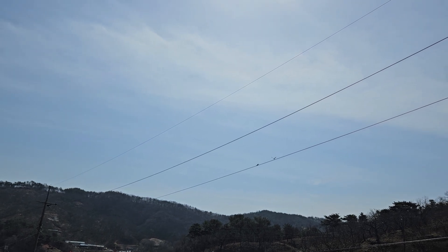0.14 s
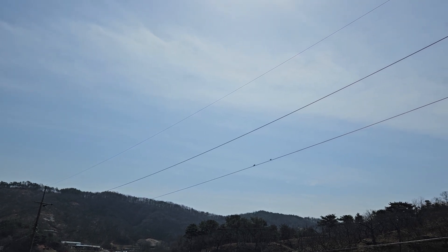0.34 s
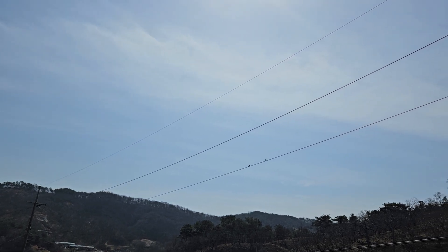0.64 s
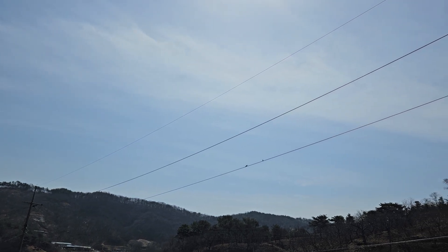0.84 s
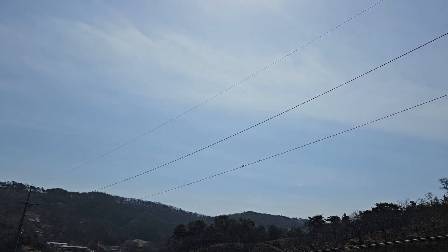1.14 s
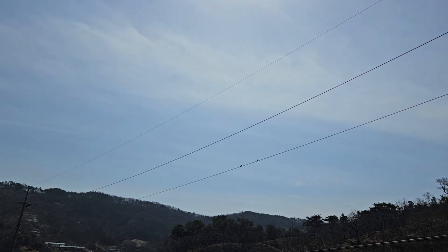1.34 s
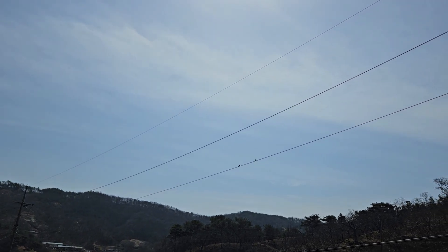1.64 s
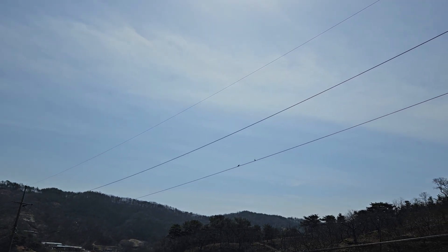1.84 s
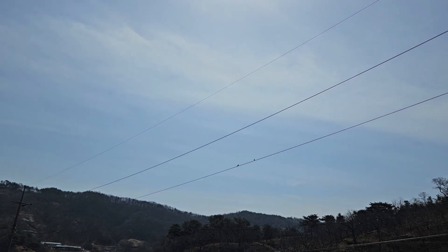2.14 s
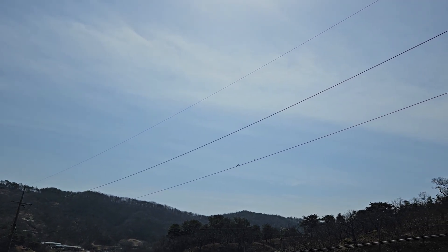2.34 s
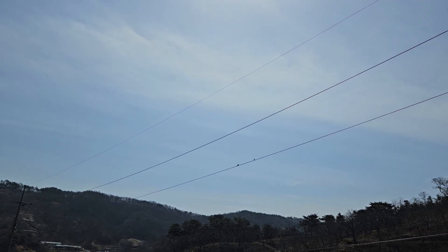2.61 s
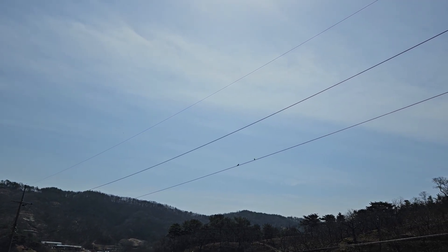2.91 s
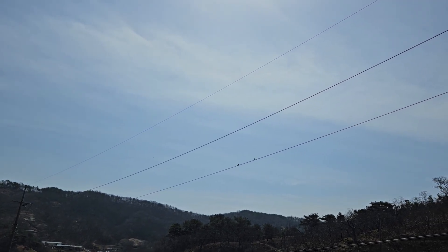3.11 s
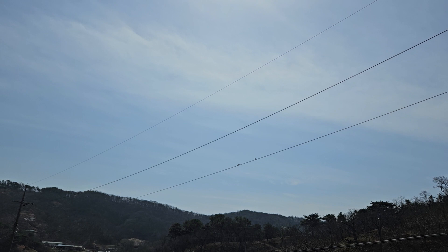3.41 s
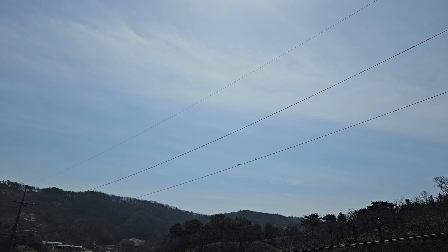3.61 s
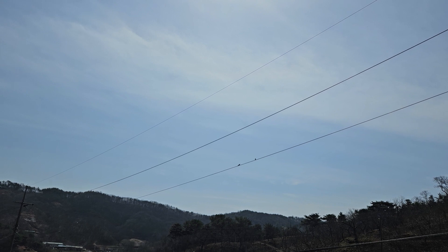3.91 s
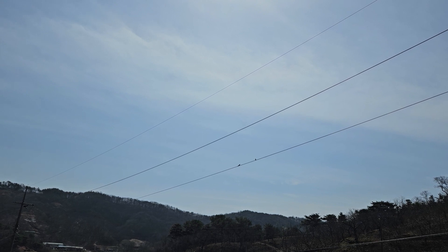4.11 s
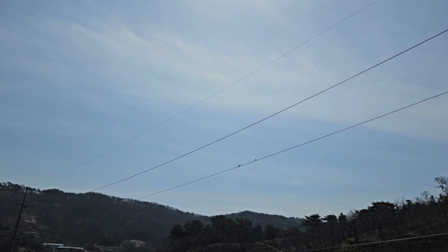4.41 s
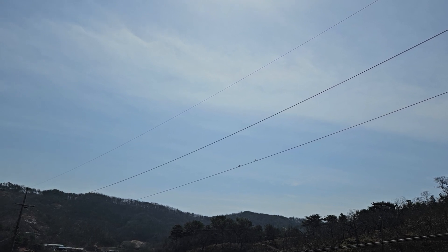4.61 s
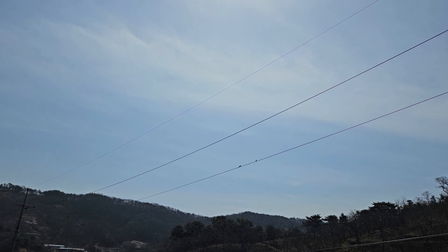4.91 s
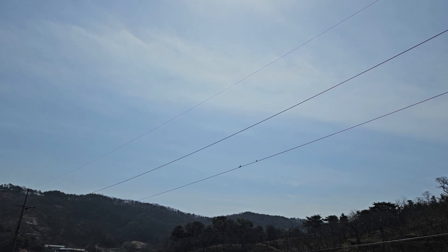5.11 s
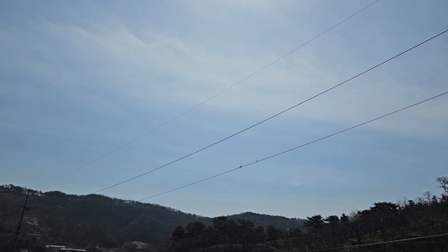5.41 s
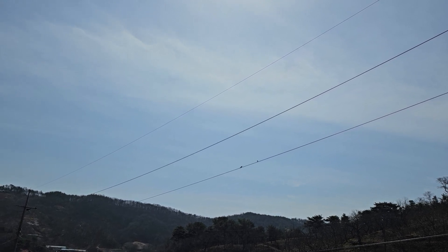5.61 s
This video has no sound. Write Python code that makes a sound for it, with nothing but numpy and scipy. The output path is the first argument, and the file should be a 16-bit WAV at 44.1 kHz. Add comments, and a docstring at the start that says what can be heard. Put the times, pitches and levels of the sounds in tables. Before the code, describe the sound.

Swallows on overhead wires twitter in quick high chirps and buzzy notes, with two dry rattles, over low wind buffeting and faint distant wash.

```python
"""Swallows twitter on overhead wires above a valley: gliding sine whistles, rasps of filtered pulses
and two dry rattles of ringing clicks. Sparse reflections give short echoes from nearby walls.
Shaped noise makes wind buffeting a small stereo microphone over a distant wash of road and leaves.
A few dry ticks, a faint wavering hum and thin far calls, all sines, fill in the rest."""
import sys
import numpy as np
from scipy import signal
from scipy.fft import rfft, irfft
from scipy.io import wavfile
from scipy.ndimage import uniform_filter1d

SR = 44100
rng = np.random.default_rng(int(sys.argv[2]) if len(sys.argv) > 2 else 0)


def transcribe(u):
    """Save the signal u as a 16-bit wav file named by the first command-line argument.

    u: samples, shape (n,) or (channels, n), limited to [-1, 1]; the rate is SR.
    q: integer samples, one column per channel.
    """
    v = np.clip(np.atleast_2d(u).T, -1, 1)
    q = np.round(v * 32767).astype(np.int16)
    wavfile.write(sys.argv[1], SR, q)


N = 253570

# Whistled notes and overtones: [start_s, length_s, first_pitch_hz, last_pitch_hz,
# level_db at the peak, peak_place 0-1 along the note]
NOTES = [(.003, .012, 5680, 4820, -51, 0.64), (0.012, .022, 4990, 4760, -47.5, 0.2),
         (.004, 0.0098, 3350, 3100, -50.5, 0), (.006, 0.024, 2830, 2395, -53.5, 0),
         (0.116, .022, 3700, 4600, -54.5, 0.94), (.136, 0.023, 4650, 4490, -55, 0.57),
         (0.132, 0.018, 6560, 6600, -66.5, 0), (0.18, 0.055, 5000, 6840, -66, 0),
         (.186, .019, 4750, 3920, -56.5, 0.93), (0.184, 0.013, 2880, 3410, -55, 0.96),
         (0.199, 0.024, 3255, 3530, -51.5, 0.9), (0.317, 0.0069, 6420, 5390, -56.5, .5),
         (0.371, 0.045, 3270, 3880, -57.5, 0.83), (0.408, 0.0096, 3910, 2790, -54, 1),
         (0.418, .015, 5000, 5250, -51, 0.26), (.428, 0.018, 5230, 6180, -53.5, 0.25),
         (.5, 0.091, 4540, 4080, -73, 0.55), (.599, 0.07, 2980, 4040, -71, 0.4),
         (.6, .045, 2520, 3040, -74, 0.5), (0.644, 0.034, 3000, 3370, -66.5, 0.6),
         (0.655, 0.02, 3960, 4250, -66, .5), (.694, 0.013, 5780, 6460, -59, 0),
         (.695, 0.043, 3830, 4020, -57, 0.68), (.703, 0.057, 2660, 2770, -65, 1),
         (.704, 0.018, 4880, 4970, -56, .2), (0.778, 0.03, 2225, 2750, -64, 0.8),
         (0.798, 0.024, 3480, 3430, -55, 0), (0.81, 0.011, 2490, 2850, -65, 0.3),
         (.833, 0.023, 3720, 4010, -57.5, 1), (.835, .022, 3100, 3520, -54, .5),
         (.836, 0.0086, 5030, 5500, -58.5, 0.85), (0.844, .01, 5500, 4860, -53.5, .3),
         (0.957, .014, 4430, 4450, -64.5, .3), (0.984, 0.034, 4100, 4480, -69, 0.66),
         (.965, .03, 5500, 5900, -73, .6), (1.003, 0.03, 5750, 6400, -70, 0.8),
         (0.952, 0.035, 3050, 3050, -85, 0.2), (1.033, .02, 8520, 8500, -68, .3),
         (1.038, .019, 4450, 4420, -62, 0), (1.04, 0.022, 3000, 2960, -65.5, 0.14),
         (1.165, 0.035, 3900, 3896, -69, 0.4), (1.243, 0.033, 3700, 3360, -71.5, 0.55),
         (1.332, 0.011, 4880, 4640, -51.5, 0.04), (1.383, 0.014, 3620, 3060, -64.5, 0.23),
         (1.425, .02, 4750, 4830, -64, 0.15), (1.431, 0.015, 4280, 4260, -63, 0),
         (1.46, 0.031, 6950, 6670, -71, .4), (1.39, 0.044, 7300, 7400, -73, 0.2),
         (1.428, .015, 5900, 5900, -70, .3), (1.479, 0.01, 3180, 3190, -65.5, 0.4),
         (1.578, .015, 3520, 2970, -75, .5), (1.602, .018, 3120, 3300, -73, .6),
         (1.668, 0.046, 2000, 2810, -74, .6), (2.045, .015, 5760, 5760, -70, .3),
         (1.737, .044, 4140, 4480, -68.5, 0.4), (1.797, 0.033, 2406, 2330, -72.5, 0.2),
         (2.073, 0.014, 3660, 3120, -68, 0.5), (2.112, .022, 3205, 3910, -57.5, .5),
         (2.135, 0.019, 3830, 3920, -62, 0.5), (2.232, 0.0215, 4200, 4810, -62.5, 0.7),
         (2.254, .014, 4730, 5200, -66, 0.5), (2.267, 0.02, 5300, 4050, -60.5, 0.26),
         (2.284, 0.012, 3605, 3260, -53.5, 0.86), (2.296, .015, 6400, 4800, -59, 0.4),
         (2.294, 0.022, 7300, 7390, -65, .1), (2.295, 0.018, 3270, 2490, -58.5, 0.62),
         (2.296, 0.039, 4260, 4240, -61.5, .1), (2.428, 0.032, 3860, 3100, -71, 0.56),
         (2.608, .012, 5100, 4880, -68, 0.7), (2.623, .018, 4850, 2930, -63.5, .4),
         (2.64, 0.019, 2920, 2750, -68, 0.5), (2.669, .02, 3190, 3810, -52, 0.63),
         (2.689, 0.04, 3810, 3740, -54, 0.07), (2.69, 0.022, 3080, 3120, -66, 0.4),
         (2.683, 0.02, 6240, 6140, -65, 0.7), (2.792, .042, 2580, 2770, -66, 1),
         (2.825, 0.019, 5300, 6340, -62.5, 0), (2.837, 0.024, 3080, 3320, -58.5, 0.54),
         (2.844, 0.035, 6330, 6520, -68, 0.6), (2.853, 0.022, 3246, 4740, -54, 0.98),
         (2.874, 0.028, 4265, 4390, -51.5, 0.1), (2.884, 0.01, 6070, 4670, -56.5, 0.4),
         (2.88, 0.012, 4180, 3060, -53.5, 0.38), (2.969, 0.018, 3460, 3750, -67, .8),
         (2.988, 0.021, 3760, 3090, -61.5, 0.6), (2.945, .008, 6150, 5400, -68, .5),
         (3.024, 0.022, 2640, 2990, -63, 0.46), (3.055, 0.036, 3020, 3450, -53, 0.77),
         (3.056, 0.024, 1584, 1625, -70, 0.6), (3.083, 0.039, 1660, 2120, -68, 0.88),
         (3.096, 0.02, 3760, 4160, -51.5, 0), (3.098, 0.024, 6330, 5450, -62, 0.6),
         (3.108, 0.025, 4370, 3900, -53.5, 0.62), (3.114, 0.011, 1950, 1960, -61, 0.35),
         (3.224, 0.011, 4480, 4400, -61.5, 0.6), (3.281, 0.028, 4950, 2770, -63, 0.32),
         (3.302, 0.047, 2720, 2600, -70, 0.2), (3.331, .02, 3114, 3920, -51.5, 0.7),
         (3.351, .02, 3930, 3900, -60, 0), (3.225, .04, 3030, 3030, -73, .5),
         (3.359, 0.0094, 3080, 3880, -49, 0), (3.426, 0.041, 3360, 3120, -66, 1),
         (3.441, 0.034, 2620, 2770, -64, 0.55), (3.468, 0.018, 3160, 4480, -55, 1),
         (3.472, 0.036, 4300, 4960, -52.5, 0.97), (3.497, 0.046, 2830, 3010, -63, 0),
         (3.507, 0.025, 4930, 4930, -50, 0.1), (3.6, 0.034, 3980, 3704, -56.5, 1),
         (3.648, .018, 3920, 4790, -46.5, 0.52), (3.664, .021, 4870, 2780, -47.5, 0.01),
         (3.674, 0.017, 6580, 4910, -56.5, 0.8), (3.681, 0.0087, 2670, 2600, -58, 0.1),
         (3.775, .044, 4000, 4690, -67, 0), (3.778, 0.044, 3380, 3980, -64, 0.56),
         (3.794, 0.032, 5080, 5550, -67.5, 0.8), (3.455, 0.064, 5250, 5800, -70, .8),
         (3.492, .02, 7900, 7800, -71, .2), (3.822, 0.013, 4460, 4220, -53, 0.93),
         (3.856, .025, 2485, 3000, -63, 0.5), (3.878, 0.026, 3045, 3240, -54.5, 0.57),
         (3.881, 0.018, 4700, 4850, -61, 0.2), (3.922, 0.037, 3090, 4050, -52, 0.43),
         (3.958, 0.022, 3950, 4210, -55.5, 0.65), (3.913, .014, 5400, 6400, -70, 0.5),
         (3.933, 0.037, 5570, 6100, -68, 0.15), (3.925, 0.0656, 2700, 3050, -58.5, 0.44),
         (4.079, 0.022, 3820, 3150, -60, 1), (4.104, 0.014, 3430, 3160, -61.5, 0.4),
         (4.114, 0.016, 3180, 3550, -63, 0.66), (4.1, 0.023, 2300, 2180, -72, 0.4),
         (4.137, .017, 5740, 3960, -59, 0.7), (4.173, 0.033, 2296, 2280, -66.5, 0),
         (4.201, .036, 2320, 2925, -57, 0.97), (4.183, 0.039, 3630, 4040, -60, 1),
         (4.201, 0.028, 4920, 6200, -68, 0.05), (4.213, 0.016, 4070, 4610, -52.5, .9),
         (4.231, 0.009, 3090, 3260, -49, 0.08), (4.232, 0.0095, 6300, 4890, -52, 0),
         (4.24, 0.098, 5010, 4780, -55.5, 0), (4.245, 0.023, 7230, 7260, -63, 0),
         (4.32, 0.027, 4100, 3170, -70, 0.2), (4.348, 0.038, 4110, 4630, -51, 0.63),
         (4.373, .04, 2604, 2564, -69.5, .5), (4.383, 0.023, 4650, 3860, -56, 0.47),
         (4.409, 0.038, 4050, 4290, -58.5, 0.84), (4.408, 0.025, 4770, 6700, -60.5, 0.06),
         (4.413, 0.012, 2680, 3200, -61, 1), (4.419, 0.014, 2947, 3595, -53, 0.63),
         (4.43, 0.017, 3430, 3170, -52, 0.17), (4.425, .03, 6460, 6830, -61, 0.8),
         (4.446, 0.022, 3350, 3670, -52.5, 0.26), (4.529, 0.011, 3990, 3550, -55, 0.13),
         (4.528, 0.0071, 5980, 5340, -55.5, 0.6), (4.528, .011, 7450, 7250, -64, 0.3),
         (4.55, .012, 6730, 5400, -54, 0.06), (4.566, 0.0092, 6610, 5600, -50.5, 0.3),
         (4.576, 0.015, 6020, 4660, -53.5, 0.33), (4.588, 0.053, 2963, 2952, -50.5, 0.28),
         (4.606, 0.031, 3330, 3840, -53.5, 0.78), (4.627, 0.025, 2960, 2930, -58, 0.3),
         (4.636, .009, 3840, 3170, -59, 0.1), (4.639, 0.01, 5770, 4330, -53, 0.9),
         (4.652, 0.015, 4770, 5480, -49, 0.9), (4.145, 0.016, 2650, 2680, -66, 0.2),
         (4.241, 0.039, 2447, 2400, -60.5, 0.1), (4.663, 0.02, 3020, 4840, -51.5, 0.01),
         (4.664, 0.012, 5600, 6280, -50, 0.03), (4.78, .04, 2590, 2810, -73, .5),
         (4.792, 0.042, 3150, 3600, -73.5, .6), (4.832, .045, 3750, 4450, -70, .8),
         (4.83, .038, 3100, 3680, -66.5, 0.73), (4.873, 0.037, 3670, 4280, -65, 0.75),
         (4.84, 0.022, 2550, 2850, -70, 0.7), (4.865, 0.037, 2830, 3350, -64, 0.94),
         (4.922, 0.019, 4380, 4620, -60, 0.2), (4.923, 0.019, 5530, 6620, -57, 0.04),
         (4.926, .018, 7500, 8440, -70, .5), (4.939, 0.025, 2716, 2590, -66, 1),
         (4.933, 0.037, 3750, 4050, -57, 0.6), (4.947, 0.026, 3350, 3160, -56.5, 1),
         (4.932, .06, 4810, 4920, -57.5, 0), (5.005, 0.022, 2280, 2500, -62, 0),
         (5.024, .064, 3620, 3460, -59, 0.1), (5.034, 0.025, 2580, 2580, -62, 0),
         (5.038, 0.018, 6600, 6860, -75, 0), (5.065, 0.0126, 3040, 3530, -49, 0.8),
         (5.076, 0.0079, 3490, 3150, -52.5, 0.16), (5.068, .009, 5200, 5580, -56, 0.9),
         (5.076, 0.0086, 5580, 5000, -52, .3), (5.069, 0.01, 4470, 5000, -55, 0.2),
         (5.115, 0.018, 5700, 5560, -65, 0.7), (5.164, 0.075, 4240, 4540, -70.5, 0.3),
         (5.188, 0.041, 5540, 6040, -70, 0.54), (5.228, .028, 5700, 6200, -71, .6),
         (5.208, 0.044, 4000, 4620, -66, .8), (5.04, 0.017, 6080, 6160, -59, 0),
         (5.416, .025, 3380, 2830, -70, 0.93), (5.439, 0.039, 2910, 3460, -72, .1),
         (5.56, 0.014, 4810, 4620, -53.5, 0.37)]
# Harsh buzzing notes: [start_s, level_db, length_s, centre_hz, width_hz, pulse_rate_hz]
RASPS = [(0.293, -69, 0.099, 5400, 1460, 910), (0.404, -63.5, 0.051, 5600, 3030, 906),
         (0.692, -60.5, 0.05, 4100, 2800, 667), (0.778, -60, 0.046, 3220, 2030, 863),
         (0.839, -60.5, 0.021, 4840, 3900, 676), (2.281, -64.5, 0.022, 4470, 4060, 700),
         (3.1, -56, 0.026, 3950, 1150, 403.7), (4.228, -65, 0.015, 4900, 3000, 800),
         (4.585, -69, 0.074, 5570, 1400, 905), (4.657, -55, 0.013, 5600, 3070, 800),
         (4.928, -58, 0.025, 4050, 3100, 670), (5.01, -58, 0.039, 3110, 2140, 869),
         (5.069, -55, 0.014, 4800, 4100, 687)]
# Rattle clicks: [start_s, level_db, ring_hz]
CLICKS = [(1.029, -51, 4770), (1.058, -45.5, 5860), (1.0896, -48, 6700), (1.1248, -54, 4840),
          (1.1548, -45, 6600), (1.1888, -50, 4100), (1.2223, -47, 6700), (1.257, -48, 6200),
          (1.2915, -47, 6830), (1.3325, -51, 4750), (5.2597, -47.5, 6340), (5.2907, -45.5, 5460),
          (5.3194, -45.5, 6700), (5.354, -47, 5800), (5.3858, -45, 6650), (5.418, -50, 6070),
          (5.4521, -45.5, 6540), (5.486, -48.5, 6200), (5.5199, -46.5, 6600), (5.5638, -53.5, 4500)]
# Stereo lean of the whistles by pitch: [pitch_hz, left_minus_right_db]
SONG_LEAN = [(2000, -6.5), (3000, -8), (4000, -3.5), (5000, -4.5), (6500, -3), (8000, -26)]
# Phase difference of the birds between the two channels, either sign: [frequency_hz, right_lag_radians]
PORT_PHASE = [(0, 16), (600, -5), (1640, -2.5), (2670, 11.5), (3530, 4.5), (4390, 5), (4650, 4.5),
              (4910, 4), (5430, -1.5), (6890, -2), (8610, 0), (10600, -13), (12700, -6), (15400, -2)]
# Single wall echoes: [delay_s, left_db, right_db]
WALLS = [(.0103, -9, -11), (.0165, -29, -8.5), (.04, -22, -24.5), (0.0457, -11, -17.5)]
# Decay time of the echo tail: [frequency_hz, t60_s]
ECHO_T60 = [(1500, 0.33), (4000, 0.22), (7000, 0.23), (12000, 0.13)]
# Small dry ticks close by: [start_s, level_db, ring_hz, left_minus_right_db]
TICKS = [(2.0034, -55.5, 4800, -26), (3.1994, -60, 1150, -7.5), (3.457, -66, 4370, -11)]
# Strength of the wind on the microphone: [time_s, level_db, left_minus_right_db]
WIND = [(0, -38, -1.5), (.3, -42, 2), (.4, -51.5, -3.5), (.55, -42.5, -3.5), (.72, -49, 4),
        (.85, -44, -6.5), (1.0, -41.5, 2.5), (1.3, -41, -2.5), (1.5, -47.5, -6), (1.73, -52, 5),
        (1.94, -58.5, -2.5), (2.5, -62.5, -0.5), (3.15, -61.5, -1), (3.45, -52.5, 6.5), (3.95, -48.5, 9),
        (4.4, -54.5, 3), (4.75, -61, -1), (4.98, -56.5, 4.5), (5.75, -55, 8)]
# Single gust thumps: [centre_s, level_db, pitch_hz]
THUMPS = [(.075, -35, 80), (.593, -38, 75), (.915, -37, 65), (1.247, -27, 61), (1.72, -43, 70),
          (3.842, -39, 50)]
# Spectrum of the wind rumble: [frequency_hz, relative_db per Hz]
RUMBLE = [(5.9, -42.5), (10, -14.5), (53, 2), (81, -6.5), (110, -14), (140, -47), (240, -120)]
# Spectrum of the wind flutter above the rumble: [frequency_hz, relative_db per Hz]
FLUTTER = [(59, -79), (100, 4), (199, -10.5), (239, -13), (332, -29), (360, -38), (400, -54), (520, -92),
           (880, -120)]
# Spectrum of the distant wash: [frequency_hz, relative_db per Hz]
WASH = [(76, -49), (130, -1), (222, -7.5), (646, -10.5), (704, -13), (944, -15.5), (1400, -14),
        (2650, -11.5), (4380, -15.5), (5480, -20.5), (8000, -19.5), (10400, -31), (17600, -120)]
# High rustle of leaves, on the same scale as the wash: [frequency_hz, relative_db per Hz]
LEAVES = [(6000, -60), (8500, -40.5), (16000, -29)]
# Swells of the wash: [time_s, low_roar_db, middle_db, high_hiss_db]
SWELLS = [(0, 3, 0, 1), (.6, -2, -3.5, -2.5), (1.1, 0, -4, 1.5), (2, -1.5, -6, 2.5), (2.4, 3.5, 0, 2),
          (2.75, -0.5, -4.5, 4.5), (3.05, 0, 0.5, 2), (3.25, 2, -5, 12), (3.6, 4.5, -3, 4),
          (4.05, .5, -2.5, 0), (4.65, 1, -2.5, 3), (4.9, 0.5, -2.5, -0.5), (5.75, -0.5, -5, 0.5)]
# Where the roar, middle and hiss of the swells are centred: [frequency_hz]
SWELL_HZ = [670, 1800, 11200]
# How alike the two channels of the wash are: [frequency_hz, likeness -1 to 1]
WASH_LIKENESS = [(60, 0.97), (180, 0.47), (550, 0.31), (1650, -0.16), (4970, -0.088), (15000, 0.03)]
# Stereo lean of the wash: [frequency_hz, left_minus_right_db]
WASH_LEAN = [(60, 20), (130, 4), (290, -3.5), (640, 0.5), (1410, -5), (3100, -7.5), (6820, -9), (15000, 13)]
# Hum lines: [pitch_hz, level_db]
HUM = [(241, -81), (360.7, -85)]
# Faint far calls, a thin high series and a few low hoots: [start_s, end_s, pitch_hz, level_db]
FAR_CALLS = [(.88, 1.152, 1500, -84.5), (1.55, 1.66, 6950, -74.5), (1.7, 1.787, 6850, -75),
             (1.85, 1.95, 6670, -80), (2.328, 2.44, 1770, -76), (3.34, 3.45, 564, -77),
             (3.45, 3.677, 560, -77), (3.54, 3.634, 744, -75), (3.64, 3.728, 505, -73.5),
             (3.71, 3.8, 691, -68.5), (5.67, 5.733, 7260, -77), (5.68, 5.74, 4040, -77)]
# Response of the microphone ports, with their notch: [frequency_hz, gain_db]
MIC = [(8300, 0.5), (9200, 0), (9680, -18), (10100, -4.5), (11700, 7), (15500, -6.5)]

SWELL_DB, FADE_DB = 7.5, 16.5  # level lost over one note length before and after the peak
RISE_EASE, FALL_EASE = 1.9, 1.412  # above 1 a glide starts fast and levels off; 1 is a straight line
EASE_BY_PLACE = -.8  # notes that peak late glide more evenly
OCTAVE_DB = -27.5  # faint second harmonic of every whistle
RATTLE_LEAN_DB = -4.5  # left minus right
SONG_ECHO_DB, RATTLE_ECHO_DB = -4.5, -4.5
SPRAY_DB = -32  # faint breathy treble that follows the loudness of the birds
FLUTTER_DB, FLUTTER_PER_DB = -13.5, -0.1057  # flutter share in a middling gust, change per dB of wind
WASH_DB = -67.5
EDGE_HZ = 15800  # upper band limit


def amp(db):
    """Decibels to gain."""
    return 10 ** (np.asarray(db) / 20)


def evened(x):
    """Scales to rms 1."""
    return x / np.sqrt(np.mean(x ** 2) + 1e-20)


def smooth_noise(count, size):
    """Slow random wander of rms 1: white noise averaged over size samples."""
    return evened(uniform_filter1d(rng.standard_normal(count), size=size))


def smoother_noise(count, size):
    """The same wander averaged twice, for rounder lumps."""
    once = uniform_filter1d(rng.standard_normal(count), size=size)
    return evened(uniform_filter1d(once, size=size))


def read(points, hz):
    """Reads a spectrum table on a log-frequency axis."""
    f, value = np.transpose(points)
    return np.interp(np.log(hz + 1), np.log(f + 1), value)


def add(mix, s, sound, pan_db):
    """Mixes a sound in at time s, shared between the channels at constant power."""
    left = amp(pan_db)
    part = mix[:, round(s * SR):][:, :len(sound)]
    gains = np.array([[left], [1]]) * np.sqrt(2 / (1 + left ** 2))
    part += gains * sound[:part.shape[1]]


def whistles(edge_s=.003, waver=.003, fray=.18):
    """Each note is a near sine that glides smoothly, with unsteady pitch and a fast fraying of its level."""
    fraying = 1 + fray * smoother_noise(N, 24)
    wobble = smooth_noise(N, 60)
    out = np.zeros((2, N))
    for s, length, first_hz, last_hz, db, place in NOTES:
        t = np.arange(-edge_s, length + edge_s, 1 / SR)
        u = np.clip(t / length, 0, 1)  # progress through the note

        ease = RISE_EASE if last_hz > first_hz else FALL_EASE
        ease = max(.7, ease + EASE_BY_PLACE * (place - .5))
        pitch = last_hz + (first_hz - last_hz) * (1 - u) ** ease
        pitch *= 1 + waver * np.resize(wobble[round(s * SR):], len(t))
        phase = 2 * np.pi * np.cumsum(pitch) / SR
        tone = np.sin(phase) + amp(OCTAVE_DB) * np.sin(2 * phase)

        before, after = np.maximum(place - u, 0), np.maximum(u - place, 0)
        level = amp(db - SWELL_DB * before - FADE_DB * after)
        shape = signal.windows.tukey(len(t), min(1, 4 * edge_s / (length + 2 * edge_s)))
        note = np.sqrt(2) * level * shape * tone
        add(out, max(s - edge_s, 0), note, read(SONG_LEAN, pitch.mean()))
    return out * fraying


def rasps(rough=.18, jitter=.04):
    """Fast uneven syrinx pulses mixed with breathy noise pass one wide resonance."""
    out = np.zeros((2, N))
    for s, db, length, hz, width, pulse_hz in RASPS:
        t = np.arange(0, length, 1 / SR)
        breath, slip = rng.standard_normal((2, SR // 8))[:, :len(t)]
        slip = evened(uniform_filter1d(slip, size=80))
        turns = np.cumsum(pulse_hz * (1 + jitter * slip)) / SR
        pulses = np.diff(np.floor(turns), prepend=0)  # one pulse per whole turn
        drive = (1 - rough) * evened(pulses) + rough * breath
        band = signal.butter(4, [hz - width / 2, hz + width / 2], "band", fs=SR, output="sos")
        buzz = evened(signal.sosfilt(band, drive))
        add(out, s, amp(db) * buzz * signal.windows.tukey(len(t), .2), -6)
    return out


def snaps(rows, ring_s, low_db, high_db):
    """Each click rings its own pitch and two fixed resonances for about a millisecond."""
    out, t = np.zeros((2, N)), np.arange(300) / SR
    low = amp(low_db) * np.sin(2 * np.pi * 4400 * t)
    high = amp(high_db) * np.sin(2 * np.pi * 7300 * t)
    burst = t / ring_s * np.exp(1 - t / ring_s)  # quick rise, exponential fall
    for s, db, hz, pan_db in rows:
        tone = np.sin(2 * np.pi * hz * t) + low + high
        add(out, s, amp(db) * burst * tone, pan_db)
    return out


def rattles():
    """Dry rattles: runs of short ringing clicks."""
    rows = [(*row, RATTLE_LEAN_DB) for row in CLICKS]
    return snaps(rows, ring_s=0.0004, low_db=-9, high_db=-5.5)


def echoes(x, start_s=.006):
    """Sparse reflections of random sign, different in each channel, each band dying at its own speed."""
    taps = np.zeros((2, SR // 2))
    at = np.arange(round(start_s * SR), SR // 2 - 20, 20)
    at = at + rng.integers(0, 20, (2, len(at)))  # one tap somewhere in every 20 samples
    np.put_along_axis(taps, at, rng.choice([-1., 1.], at.shape), 1)
    hz, t, z = signal.stft(taps, SR, nperseg=256)
    decay_db = -60 * t / read(ECHO_T60, hz)[:, None]
    tail = signal.istft(z * amp(decay_db), SR, nperseg=256)[1]
    return signal.fftconvolve(x, tail / np.linalg.norm(tail[0]), axes=1)[:, :N]


def birds():
    """Song and rattles with tail and wall echoes, phase-shifted between channels, plus breathy treble."""
    song, rattle = whistles() + rasps(), rattles()
    near = song + rattle
    heard = near + echoes(amp(SONG_ECHO_DB) * song + amp(RATTLE_ECHO_DB) * rattle)
    for delay, *db in WALLS:
        lag = round(delay * SR)
        heard[:, lag:] += amp(db)[:, None] * near[:, :-lag]

    phase = read(PORT_PHASE, np.fft.rfftfreq(N, 1 / SR))
    heard[1] = irfft(rfft(heard[1]) * np.exp(-1j * phase), N)

    loudness = np.sqrt(abs(uniform_filter1d(heard ** 2, size=200)))
    treble = np.diff(rng.standard_normal((2, N + 1)))
    return heard + amp(SPRAY_DB) * loudness * treble


def ticks():
    """Small dry ticks close by: short ringing clicks without echo."""
    return snaps(TICKS, ring_s=0.00048, low_db=-6, high_db=-4)


def noise(field_db, likeness, size, patchy_db):
    """Two-channel noise from short-time spectra; field_db(hz, t) shapes it, with random patches."""
    frames, hz = 4 * N // size + 5, np.fft.rfftfreq(size, 1 / SR)
    a, b, c, d, patches = rng.standard_normal((frames, len(hz), 5)).T
    for axis in (0, 1):
        patches = uniform_filter1d(patches, size=9, axis=axis)
    patches = evened(patches)
    left, other = a + 1j * b, c + 1j * d
    same = np.clip(likeness(hz), -1, 1)[:, None]
    z = np.array([left, same * left + np.sqrt(1 - same ** 2) * other])
    t = np.arange(frames) * size / 4 / SR
    z *= amp(field_db(hz[:, None], t) + patchy_db * patches)
    return evened(signal.istft(z, nperseg=size, noverlap=3 * size // 4)[1][:, :N])


def gusts():
    """Lumpy low turbulence at the two ports, with a flutter above it."""
    knots_s, knots_db, knots_pan = np.transpose(WIND)
    t = np.arange(N) / SR
    db, pan_db = np.interp(t, knots_s, knots_db), np.interp(t, knots_s, knots_pan)

    def rumble_db(hz, t):
        # stronger gusts carry smaller eddies, so the rumble brightens with level
        tilt = 0.3 * np.log2((hz + 1) / 45) * (np.interp(t, knots_s, knots_db) + 48)
        return read(RUMBLE, hz) + tilt

    def flutter_shape_db(hz, t):
        return read(FLUTTER, hz) + 0 * t

    rumble = noise(rumble_db, lambda hz: 0.72 + 0 * hz, size=4096, patchy_db=3.0)
    flutter = noise(flutter_shape_db, lambda hz: 0.52 + 0 * hz, size=2048, patchy_db=3.0)
    flutter_db = FLUTTER_DB + FLUTTER_PER_DB * (db - db.mean())
    flutter *= amp(flutter_db + np.array([[-1.5], [1.5]]))  # leans to the right
    lumps = evened(amp(3.06 * smoother_noise(N, 900)))
    out = amp(db + [pan_db / 2, -pan_db / 2]) * lumps * (rumble + flutter)
    return out * signal.windows.tukey(N, .004)  # short fades at both ends


def thumps():
    """Single gust thumps: low cosines under a bell-shaped envelope."""
    out, t = np.zeros((2, N)), np.arange(-.03, .05, 1 / SR)
    for s, db, hz in THUMPS:
        bell = np.exp(-(t * hz / 0.46) ** 2)
        add(out, s - .03, amp(db) * bell * np.cos(2 * np.pi * hz * t - .6), -2.5)
    return out


def wash():
    """Distant road and leaves: smooth noise whose roar, middle and hiss swell on their own."""
    s, *swells = np.transpose(SWELLS)

    def field_db(hz, t):
        level = np.maximum(read(WASH, hz), read(LEAVES, hz))
        for one, db in zip(np.eye(3), swells):
            share = np.interp(np.log(hz + 1), np.log(SWELL_HZ), one)  # crossfades between the bands
            level = level + share * np.interp(t, s, db)
        return level

    out = noise(field_db, lambda hz: read(WASH_LIKENESS, hz), size=1024, patchy_db=2.04)
    lean_db = read(WASH_LEAN, np.fft.rfftfreq(N, 1 / SR)) / 2
    return amp(WASH_DB) * irfft(rfft(out) * amp([lean_db, -lean_db]), N)


def far_calls(unsteady=0.0058):
    """Faint sines of unsteady pitch that fade in and out."""
    out = np.zeros((2, N))
    for s, end, hz, db in FAR_CALLS:
        waver = smooth_noise(SR // 2, 400)[:round((end - s) * SR)]
        call = np.sin(2 * np.pi * np.cumsum(hz * (1 + unsteady * waver)) / SR)
        add(out, s, np.sqrt(2) * amp(db) * np.hanning(len(call)) * call, -4)
    return out


def hum():
    """Steady sine lines whose level wavers slowly."""
    t, out = np.arange(N) / SR, np.zeros((2, N))
    for hz, db in HUM:
        level = amp(db + 2.46 * smooth_noise(N, 6000))
        add(out, 0, np.sqrt(2) * level * np.sin(2 * np.pi * hz * t), -1.5)
    return out


def scene():
    """The birds and the ticks over wind, wash, far calls and hum."""
    return birds() + ticks() + gusts() + thumps() + wash() + far_calls() + hum()


def record(dry):
    """The notch of the microphone ports and the band limit."""
    heard = irfft(rfft(dry) * amp(read(MIC, np.fft.rfftfreq(N, 1 / SR))), N)
    lowpass = signal.firwin(511, EDGE_HZ, window=("kaiser", 9), fs=SR)
    return signal.oaconvolve(heard, lowpass[None], "same", axes=1)


dry = scene()
out = record(dry)
transcribe(out)
```